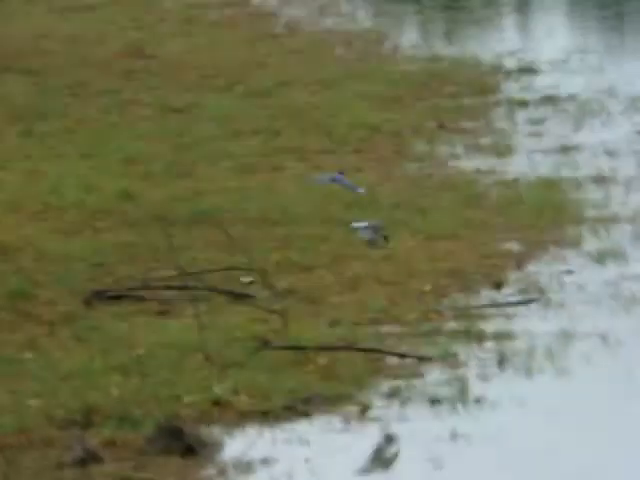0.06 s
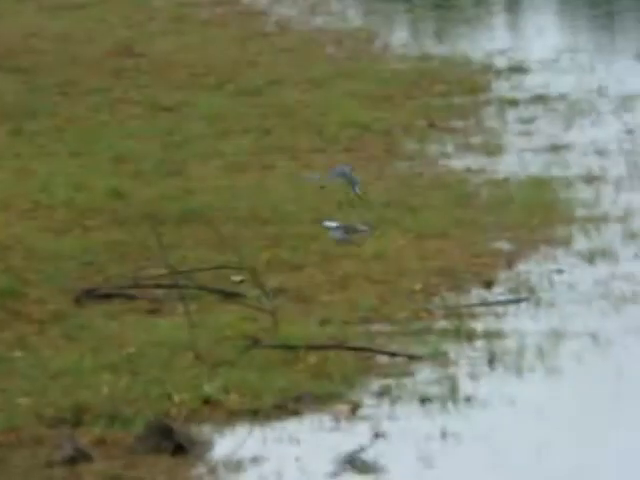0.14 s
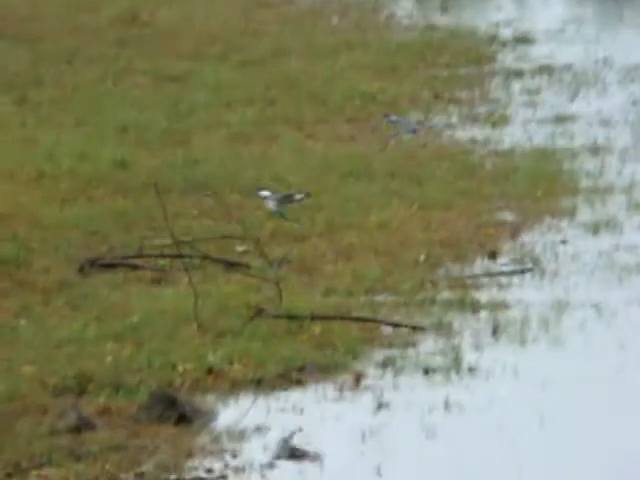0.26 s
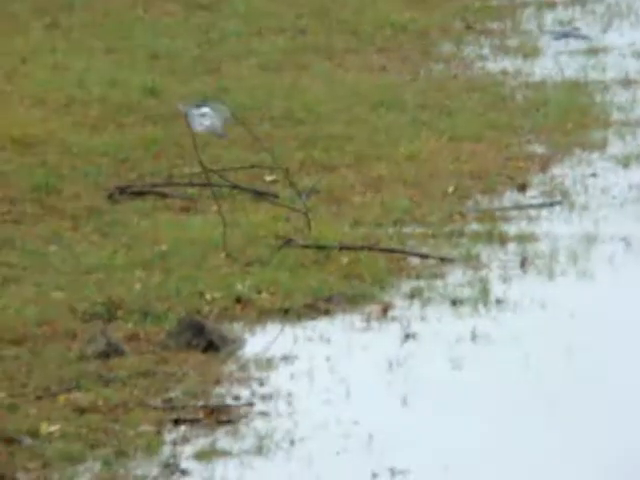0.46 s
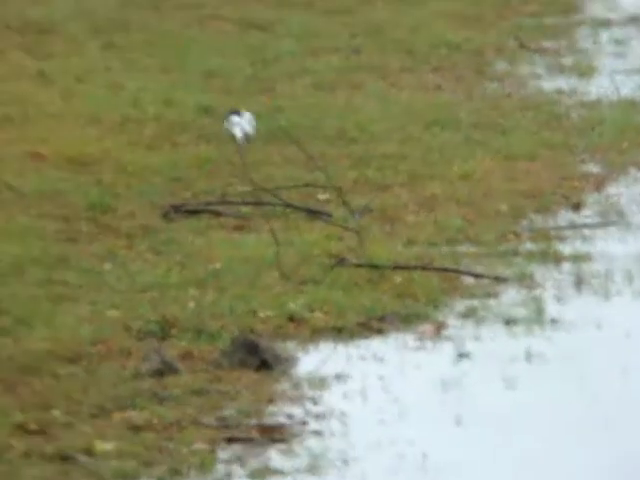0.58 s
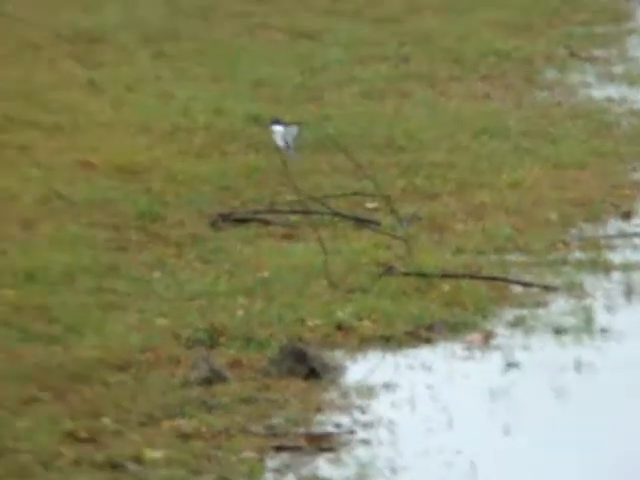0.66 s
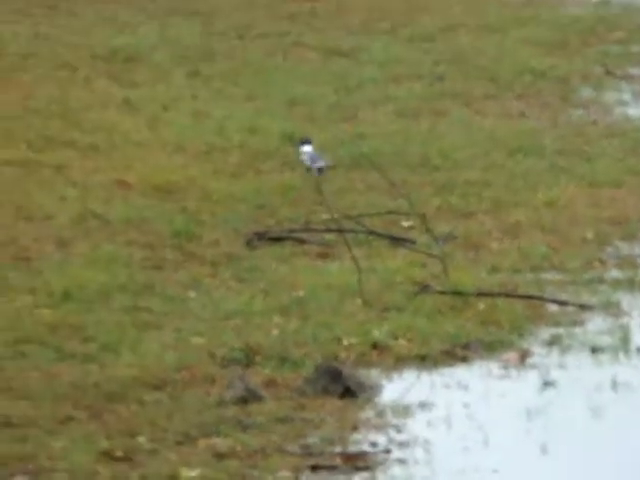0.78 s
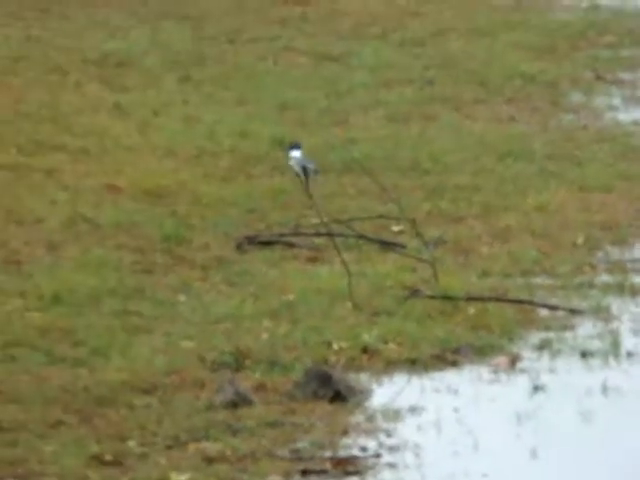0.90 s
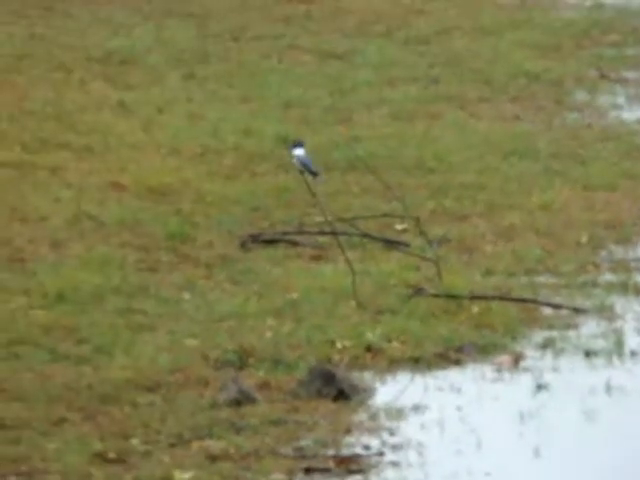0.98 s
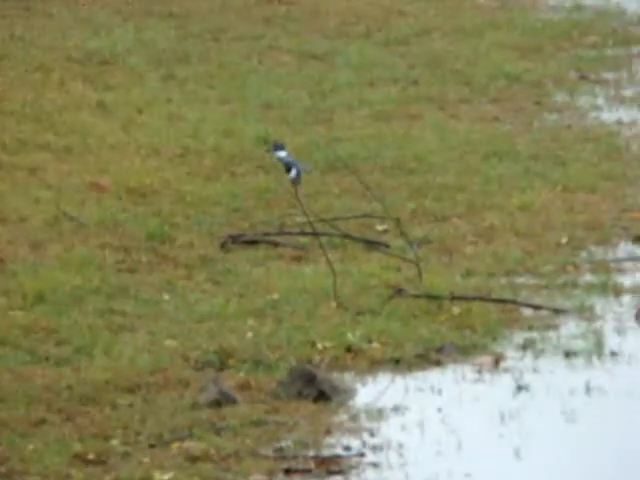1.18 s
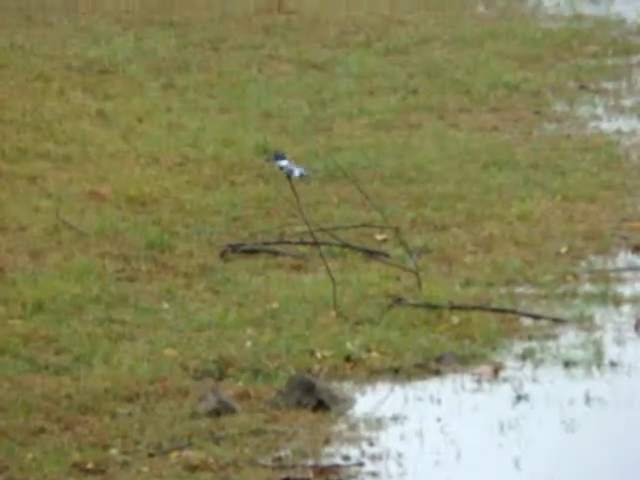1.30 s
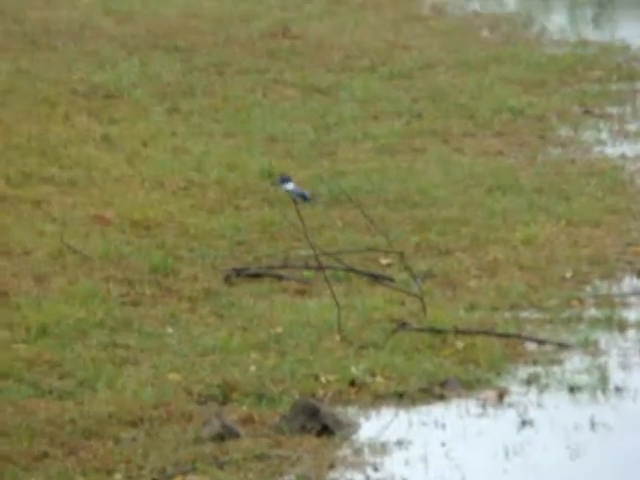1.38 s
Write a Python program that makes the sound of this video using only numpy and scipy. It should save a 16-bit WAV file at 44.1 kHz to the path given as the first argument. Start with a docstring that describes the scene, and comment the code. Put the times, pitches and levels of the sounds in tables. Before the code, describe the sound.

Rapid kingfisher chips far off through wind-like hiss, plus a sharp camera knock and handling ticks.

```python
"""A steady wind-like rush with a fluttering hollow band and a rustling hiss lies over a lake shore.
Distant kingfishers rattle through it: a run of short, steeply falling chips, each with a brief
scattered echo. Close by, a hand-held camera's casing ticks and gives one sharp knock, ringing in the
same hollow modes. Friction makes it sing softly, and the grip scuffs, taps and shifts. Short hollow
pips are dotted through the background, with faint high squeaks and two soft low bumps."""
import sys
import numpy as np
from scipy import signal
from scipy.fft import rfft, irfft, next_fast_len
from scipy.io import wavfile
from scipy.ndimage import map_coordinates

SR = 44100
rng = np.random.default_rng(int(sys.argv[2]) if len(sys.argv) > 2 else 0)


def generate_wav(sig):
    """Save sig (samples, or channels by samples) to the path in sys.argv[1] as 16-bit PCM at SR."""
    pcm = np.round(np.clip(np.atleast_2d(sig).T, -1, 1) * 32767).astype(np.int16)
    wavfile.write(sys.argv[1], SR, pcm)


N = 63945
TIME_S = np.arange(N) / SR


def amp(db):
    """Decibels to linear gain."""
    return 10 ** (np.asarray(db) / 20)


def unit(x):
    """Scale to rms 1."""
    return x / np.sqrt(np.mean(x ** 2) + 1e-20)


def along(points, hz):
    """Read a curve of (frequency, value) points on a log frequency axis."""
    freqs, values = np.transpose(points)
    return np.interp(np.log(np.abs(hz) + 1), np.log(freqs + 1), values)


def filtered(x, response):
    """Equalise x with a gain given as a function of frequency."""
    size = next_fast_len(N + SR // 2)
    return irfft(rfft(x, size) * response(np.fft.rfftfreq(size, 1 / SR)), size)[:N]


def noise(colour):
    """Noise of rms 1, coloured by (freq_hz, gain_db) points."""
    return unit(filtered(rng.standard_normal(N), lambda hz: amp(along(colour, hz))))


def wobble(rate_hz):
    """A smooth random curve with rate_hz knots a second."""
    knots = rng.standard_normal(int(N * rate_hz / SR) + 4)
    return map_coordinates(knots, [TIME_S * rate_hz])


def gate(t, length_s, edge_s):
    """Open from 0 to length_s, with soft edges."""
    return np.sin(np.pi / 2 * np.clip(np.minimum(t, length_s - t) / edge_s + .5, 0, 1)) ** 2


def air():
    """A steady wind-like rush and a rustling hiss; the hollow middle band flutters."""
    # tone of each layer: freq_hz, gain_db
    rush_colour = [(25, -38), (65, -31.5), (100, -21), (150, -13), (280, -14), (450, -8.5), (650, -12),
                   (950, -5), (1200, -5.5), (1450, 0), (1750, -11.5), (2050, -15.5), (2330, -14),
                   (2600, -16), (2950, -19.5), (3400, -18.5), (4000, -21.5), (4800, -25), (7200, -23),
                   (10000, -27)]
    hollow_colour = [(900, -21), (1150, -3), (1400, -24), (1720, 7.5), (1950, -35), (2400, -39.5)]
    hiss_colour = [(1500, -28), (3000, 9), (4000, 9.5), (6000, -4), (10000, -8)]
    # fader rides: time_s, level_db
    rush_ride = [(0, -48), (0.202, -48), (.37, -50.5), (0.499, -47.5), (.7, -49), (0.921, -48.5),
                 (1.101, -48.5), (1.26, -50), (1.34, -50.5), (1.45, -47.5)]
    hiss_ride = [(0, -60.5), (.15, -74), (.25, -63.5), (0.451, -57.5), (.6, -56), (.83, -64), (.93, -58.5),
                 (1.079, -64), (1.2, -62.5), (1.45, -60)]
    rush_db = np.interp(TIME_S, *np.transpose(rush_ride))
    hiss_db = np.interp(TIME_S, *np.transpose(hiss_ride))
    flutter_db = 6 * np.tanh(wobble(rate_hz=110))
    hollow = unit(noise(hollow_colour) * amp(flutter_db))
    rustle_db = 1.8 * wobble(rate_hz=45)
    hiss = amp(hiss_db + rustle_db) * noise(hiss_colour)
    return amp(rush_db) * (noise(rush_colour) + amp(-7) * hollow) + hiss


def casing_ring(contacts):
    """Every contact rings the casing; soft ones barely reach the high modes."""
    # modes of the casing: pitch_hz, level_db, t60_s
    modes = [(477, -34.5, 0.085), (960, -13, 0.019), (1124, -15, 0.028), (1578, -1, 0.013),
             (1882, -13.5, 0.018), (2045, -18.5, .015), (2294, -15, 0.027), (2930, -3.5, 0.0052),
             (2850, -11, 0.012), (3403, 0, 0.0077), (4280, -5.5, 0.0066), (5410, -16, 0.013),
             (6870, -21, 0.014), (8850, -18.5, 0.0046)]
    out, t = np.zeros(N + SR), np.arange(SR // 10) / SR
    attack = 1 - np.exp(-t / .00008)
    low_cut = signal.butter(2, 525, "high", fs=SR, output="sos")
    for start_s, peak_db, brightness_hz in contacts:
        ring = np.zeros(len(t))
        for k, (hz, level_db, t60_s) in enumerate(modes):
            decay = amp(level_db + rng.standard_normal() - 60 * t / t60_s)
            ring += (-1) ** k * decay * np.cos(2 * np.pi * hz * t)
        high_cut = signal.butter(4, brightness_hz, fs=SR, output="sos")
        ring = signal.sosfilt(np.vstack([high_cut, low_cut]), ring * attack)
        out[round(start_s * SR):][:len(t)] += amp(peak_db) * ring / np.abs(ring).max()
    return out[:N]


def ticks():
    """Light contacts tick on the casing."""
    # contacts: start_s, peak_db, brightness_hz
    touches = [(.0565, -38, 2400), (.2516, -33, 2500), (.3341, -35, 1900), (.6903, -33, 7500),
               (.699, -34, 2500), (.7118, -25, 4600), (.7130, -29, 3800), (.8809, -27, 3400),
               (.8838, -31, 1700)]
    return casing_ring(touches)


def kingfishers():
    """Each chip sags for an instant, then dives; the throat favours partials two and three."""
    # chips: fall_start_s, level_db, upper_partials_db, fall_length_s, hold_gain_db
    chips = [(0.132, -47, -11.5, 0.013, -7), (0.167, -42.5, -4.5, 0.0081, -11),
             (0.273, -48.5, -2.5, 0.009, -11), (0.329, -53.5, 3.5, 0.0071, -25),
             (0.385, -50.5, 1, 0.016, -30.5), (0.444, -53, 4, 0.012, 2), (0.497, -53.5, -1.5, 0.0094, 5.5),
             (0.548, -53, -7.5, 0.016, -0.5), (0.6087, -50.5, -5, 0.0032, 6.5), (0.66, -51, -16, 0.0089, 3),
             (0.719, -46.5, -6, .008, 1.5), (0.728, -47, -9.5, 0.0047, 5.5), (0.765, -48, -7, 0.013, 3),
             (0.821, -45, -6, 0.0035, -2), (0.947, -49.5, -8.5, 0.0041, -2), (1.004, -48.5, -5, 0.0053, -8),
             (1.0715, -42, -6.5, 0.0053, -4), (1.136, -43.5, -6.5, 0.0068, -1), (1.21, -42, -10, 0.006, 0)]
    # tone of the throat and of a chip's gritty edge: freq_hz, gain_db
    throat = [(1200, -25), (2000, -7), (2400, -3), (3300, 0), (4500, -1), (5000, -2), (5450, -20),
              (9000, -35)]
    grit_colour = [(1800, -10.5), (2300, -3.5), (3200, -9), (4300, -2.5), (5400, -8), (6800, 7),
                   (9500, -9.5)]
    top_hz, sag_hz_per_s, fall_hz_per_s = 1740, 16000, 66000  # of the weak fundamental
    hold_s, edge_s = .0035, .002
    jitter, rasp_depth, rasp_hz = .024, .33, 1100
    out = np.zeros(N)
    for fall_start_s, level_db, upper_db, fall_s, hold_db in chips:
        t = TIME_S - fall_start_s
        sag_hz = sag_hz_per_s * np.clip(t, -hold_s, 0)
        dive_hz = fall_hz_per_s * np.clip(t, 0, fall_s + edge_s)
        hz = (top_hz - sag_hz - dive_hz) * (1 + jitter * wobble(rasp_hz))
        phase = 2 * np.pi * np.cumsum(hz) / SR
        partials = sum(amp(db + along(throat, k * hz)) * np.sin(k * phase)
                       for k, db in enumerate([0, 0, upper_db, upper_db], 1))
        grit = amp(upper_db - 11) * noise(grit_colour)
        voice = np.sqrt(2) * partials + grit
        holding = np.clip(.5 - t / edge_s, 0, 1)  # 1 before the dive, 0 once it is under way
        envelope = gate(t + hold_s, hold_s + fall_s, edge_s) * amp(level_db + hold_db * holding)
        rasp = 1 + rasp_depth * wobble(rasp_hz)
        out += shore_echo(envelope * voice * rasp)
    return out


def shore_echo(chip):
    """The shore adds one early reflection and a short scattered tail, new for every chip."""
    # tone of the tail: freq_hz, gain_db
    tail_colour = [(2000, -2), (2900, -5), (3200, -2), (3350, 7), (3550, -2), (3900, -2), (4700, 1),
                   (6000, -3)]
    reflection_s, reflection_db = .0085, -11
    predelay_s, t60_s, tail_db = .005, .075, -5.5
    tail = noise(tail_colour) * amp(-60 * TIME_S / t60_s) * (TIME_S > predelay_s)
    impulse = amp(tail_db) * tail / np.linalg.norm(tail)
    impulse[0] += 1  # direct sound
    impulse[round(reflection_s * SR)] += amp(reflection_db)
    return signal.fftconvolve(chip, impulse[:SR // 8])[:N]


def rubs():
    """Friction keeps the casing singing for a moment, at an unsteady pitch and level."""
    # rubs: start_s, length_s, level_db, pitch_hz
    strokes = [(0.134, 0.023, -45, 1230), (0.298, 0.013, -41.5, 1380), (0.403, 0.024, -44, 1330),
               (0.436, 0.014, -40.5, 1534), (.450, 0.02, -41.5, 1364), (0.573, 0.0173, -40, 1400),
               (0.622, 0.013, -44.5, 1300), (0.736, 0.028, -43, 1350), (0.777, 0.027, -47, 1304),
               (0.888, 0.0234, -42, 1426), (0.91, 0.029, -49, 1300), (1.374, 0.013, -46.5, 1500),
               (1.412, 0.023, -45.5, 1390)]
    jitter, flutter_db, rate_hz = .11, 3, 330
    out = np.zeros(N)
    for start_s, length_s, level_db, pitch_hz in strokes:
        hz = pitch_hz * (1 + jitter * wobble(rate_hz))
        phase = 2 * np.pi * np.cumsum(hz) / SR
        tone = unit(np.sin(phase) * amp(flutter_db * wobble(rate_hz)))
        out += amp(level_db) * gate(TIME_S - start_s, length_s, edge_s=.002) * tone
    return out


def knock():
    """One sharp hit on the casing, then quick, duller rebounds."""
    # hit and rebounds: start_s, peak_db, brightness_hz
    hits = [(.2110, -7, 8800), (.2127, -16, 3250), (.2190, -27.5, 2360), (.2240, -28.5, 2470),
            (.2310, -39, 2500)]
    return casing_ring(hits)


def pips():
    """Each hollow pip is a few cycles of one pitch that swell and die at once."""
    # pips: start_s, peak_db, pitch_hz
    notes = [(.2857, -38, 1670), (.4000, -33.5, 1560), (.4080, -32.5, 1500), (.4175, -36, 1450),
             (.5205, -39, 1600), (.535, -38, 1600), (.7140, -31, 1530), (.8190, -35.5, 1650),
             (.8525, -39.5, 1550), (.8669, -38.5, 1510), (.9677, -38.5, 1530), (.9860, -37, 1710),
             (1.0874, -39, 1490), (1.1533, -37, 1670), (1.1862, -35.5, 1630), (1.2200, -38, 1680),
             (1.2355, -39.5, 1650), (1.2865, -36, 1630), (1.3024, -39.5, 1710), (1.3202, -35.5, 1690),
             (1.3688, -35, 1500), (1.4017, -35.5, 1520), (1.4107, -37.5, 1410), (1.4360, -36.5, 1500)]
    rise_s, sharpness = .0014, 2.5
    out = np.zeros(N)
    for start_s, peak_db, hz in notes:
        t = np.maximum(TIME_S - start_s, 0)
        swell = (t / rise_s * np.exp(1 - t / rise_s)) ** sharpness
        out += amp(peak_db) * swell * np.sin(2 * np.pi * hz * t)
    return out


def friction_noise(strokes, colour, edge_s):
    """Each stroke opens a short burst of coloured friction noise."""
    envelope = sum(amp(level_db) * gate(TIME_S - start_s, length_s, edge_s)
                   for start_s, length_s, level_db in strokes)
    return noise(colour) * envelope


def scuffs():
    """The grip scuffs in dry midrange bursts."""
    # scuffs: start_s, length_s, level_db
    strokes = [(.331, 0.02, -40.5), (.635, 0.045, -64), (.682, 0.043, -47), (.984, 0.022, -46.5),
               (1.034, 0.021, -45.5)]
    # their tone: freq_hz, gain_db
    colour = [(40, -40), (150, -23), (420, -19), (620, -1), (930, 5.5), (1300, 5), (2000, -0.5),
              (4000, -10), (5800, -13.5), (7000, -11), (10000, -21)]
    return friction_noise(strokes, colour, edge_s=.002)


def squeaks():
    """Faint squeaks: flecks of friction in a narrow, high band."""
    # squeaks: start_s, length_s, level_db
    strokes = [(.334, 0.0043, -59.5), (.351, 0.0019, -47.5), (.642, 0.0046, -54), (.654, .003, -52.5),
               (.67, 0.0028, -50.5), (.681, 0.0025, -57.5), (.690, 0.0032, -49), (.699, .004, -50.5),
               (.712, 0.0028, -51)]
    # their tone: freq_hz, gain_db
    colour = [(5500, -33), (6500, -16.5), (7050, -6.5), (7500, -27), (8500, -23)]
    return friction_noise(strokes, colour, edge_s=.001)


def taps():
    """Dull taps on the grip ring only the low cavity modes."""
    # taps: start_s, level_db
    touches = [(.3395, -44), (.3518, -37.5), (1.0365, -45), (1.044, -42)]
    # modes of the cavity: pitch_hz, level_db, t60_s
    cavity = [(435, -2.5, 0.035), (690, -9.5, 0.021), (962, 0.5, 0.035), (1190, -9, .03)]
    rise_s = .0009
    out = np.zeros(N)
    for start_s, level_db in touches:
        t = np.maximum(TIME_S - start_s, 0)
        ring = sum(amp(db - 60 * t / t60_s) * np.sin(2 * np.pi * hz * t) for hz, db, t60_s in cavity)
        out += amp(level_db) * ring * (1 - np.exp(-t / rise_s))
    return out


def grip_shifts():
    """The grip shifts with a dull, soft-edged swell of low noise."""
    # shifts: start_s, length_s, level_db
    strokes = [(.345, 0.015, -58.5), (.684, 0.045, -51)]
    # their tone: freq_hz, gain_db
    colour = [(30, -20), (100, 7.5), (280, 12), (550, 6.5), (900, -28.5)]
    return friction_noise(strokes, colour, edge_s=.031)


def bumps():
    """Single low pushes on the microphone, each a bell-shaped pulse."""
    # pushes: centre_s, peak_db
    pushes = [(0.431, -49.5), (0.528, -48)]
    width_s = .0014
    return sum(amp(db) * np.exp(-((TIME_S - centre_s) / width_s) ** 2) for centre_s, db in pushes)


def scene():
    """Mono mix: the air bed, birds far off, background pips and handling noises close by."""
    impacts = ticks() + knock() + taps() + bumps()
    friction = rubs() + scuffs() + squeaks() + grip_shifts()
    return (air() + kingfishers() + pips() + impacts + friction)[None]


def record(dry):
    """The camera keeps nothing above its band limit."""
    top_hz = 10200
    return filtered(dry[0], lambda hz: hz < top_hz)[None]


dry = scene()
out = record(dry)
generate_wav(out)
```